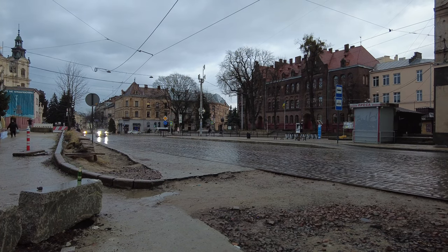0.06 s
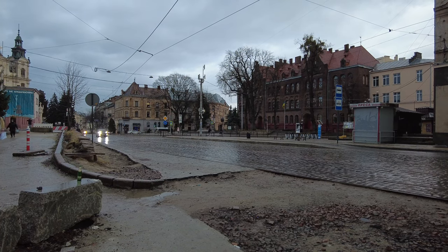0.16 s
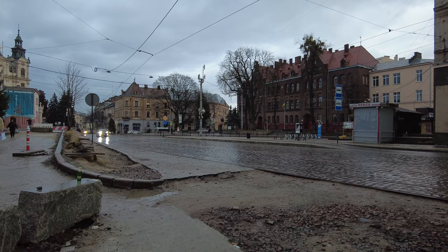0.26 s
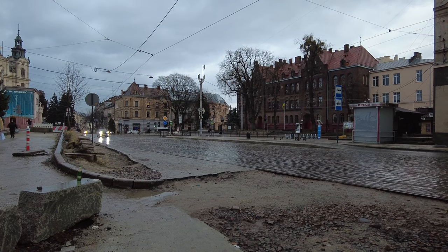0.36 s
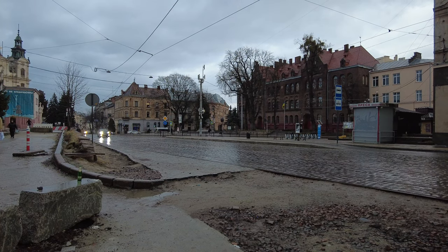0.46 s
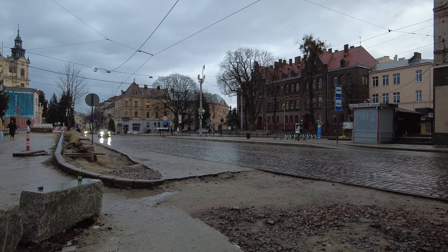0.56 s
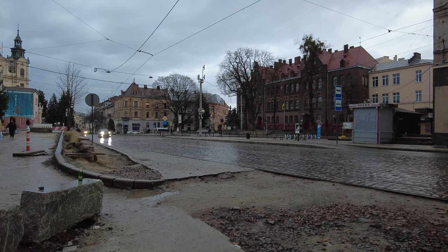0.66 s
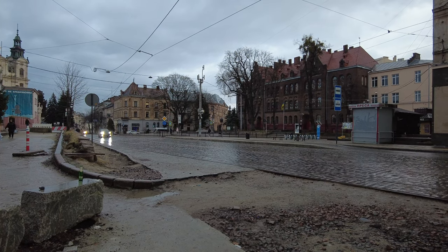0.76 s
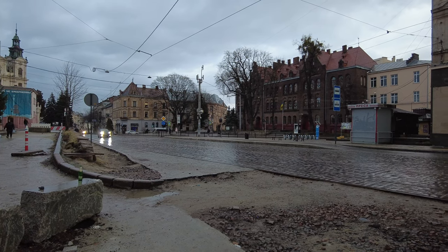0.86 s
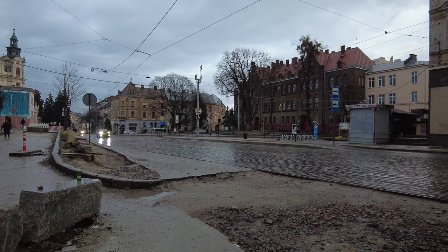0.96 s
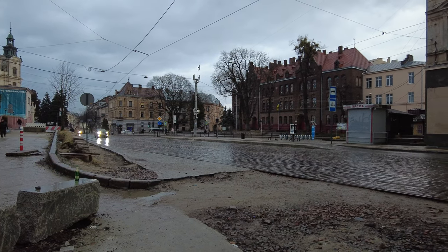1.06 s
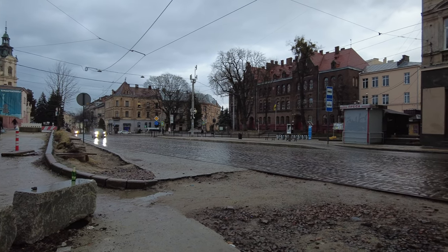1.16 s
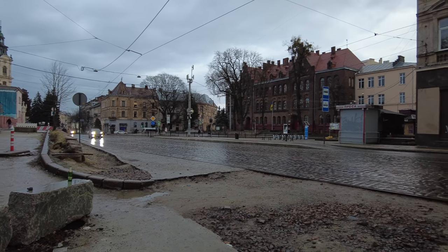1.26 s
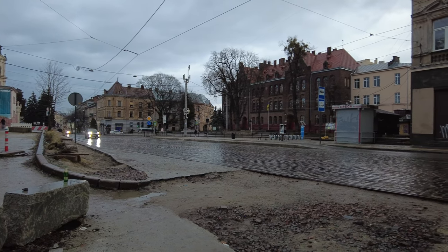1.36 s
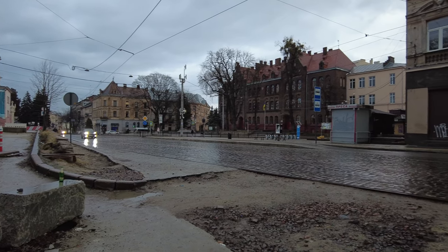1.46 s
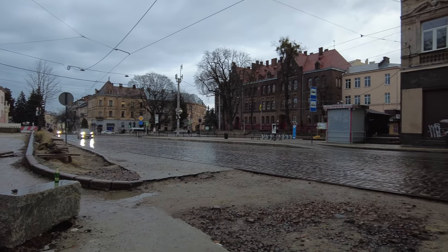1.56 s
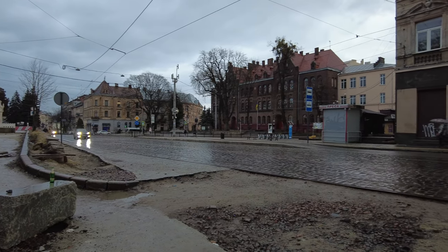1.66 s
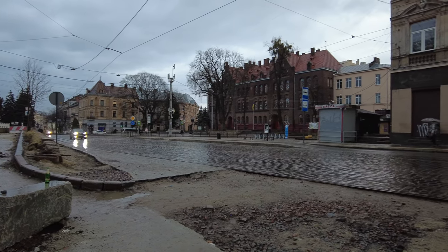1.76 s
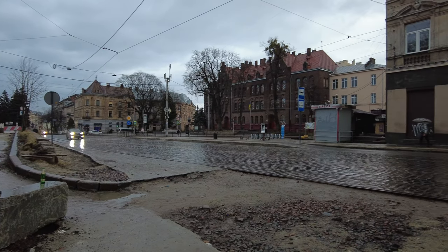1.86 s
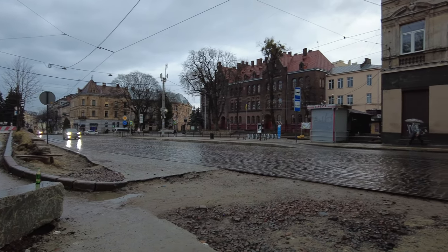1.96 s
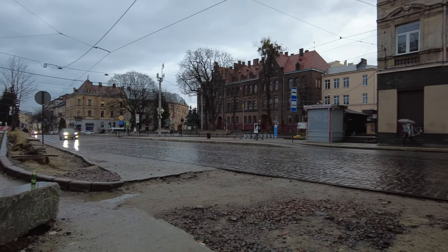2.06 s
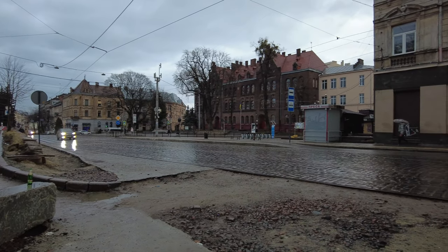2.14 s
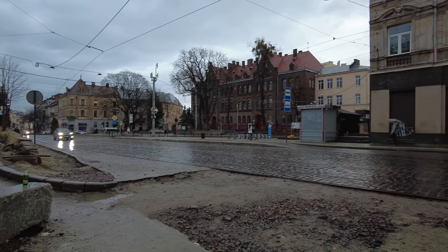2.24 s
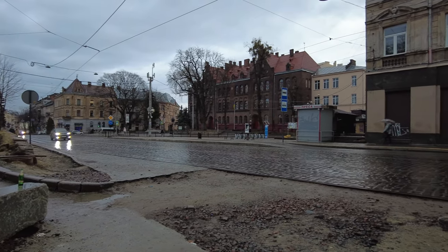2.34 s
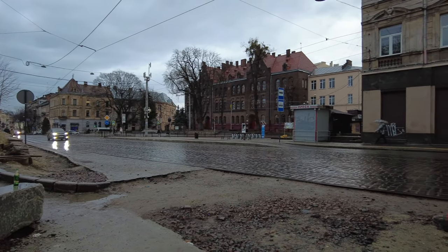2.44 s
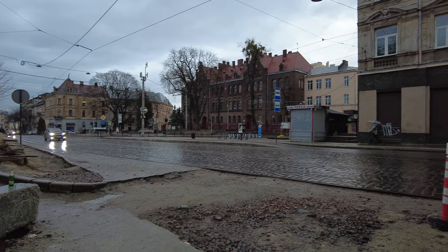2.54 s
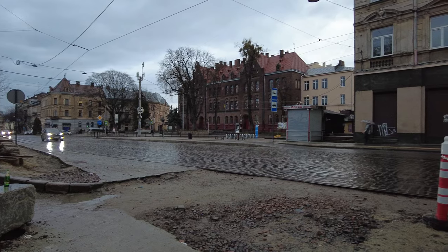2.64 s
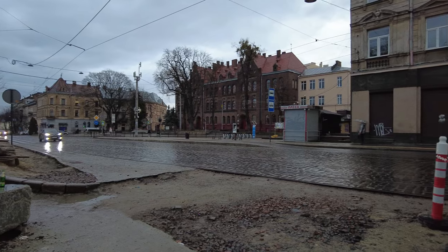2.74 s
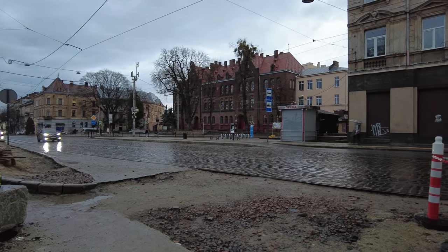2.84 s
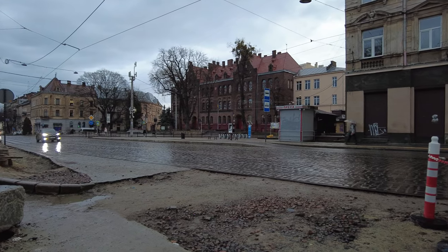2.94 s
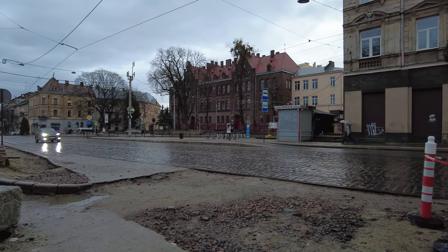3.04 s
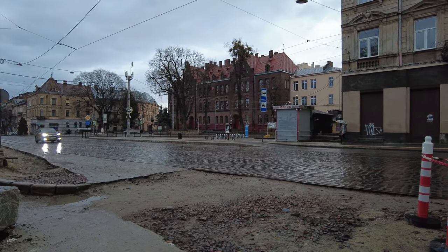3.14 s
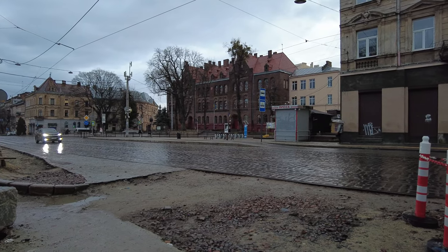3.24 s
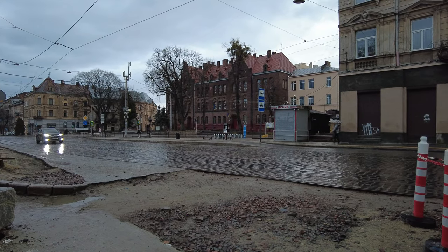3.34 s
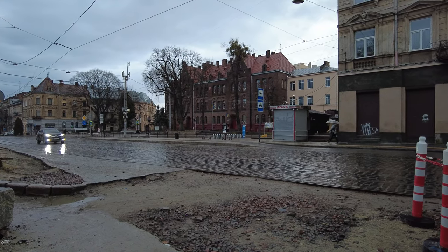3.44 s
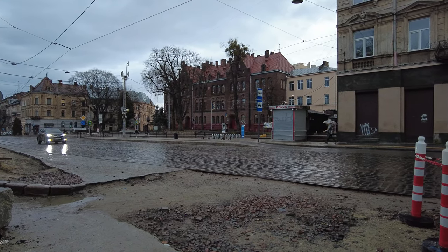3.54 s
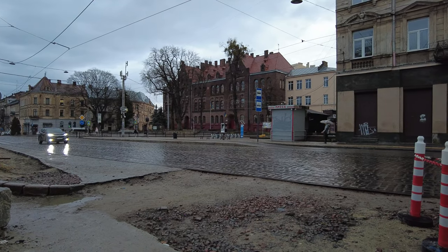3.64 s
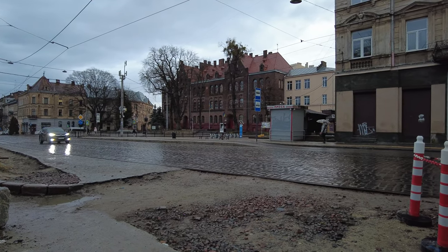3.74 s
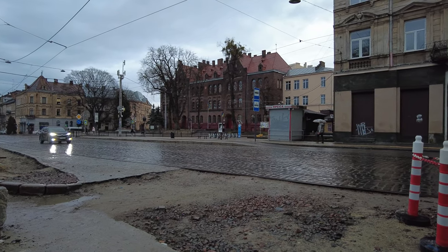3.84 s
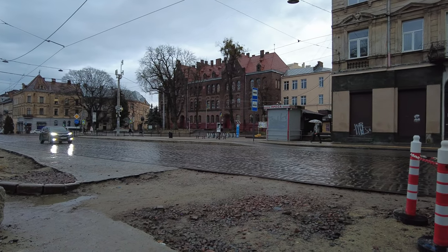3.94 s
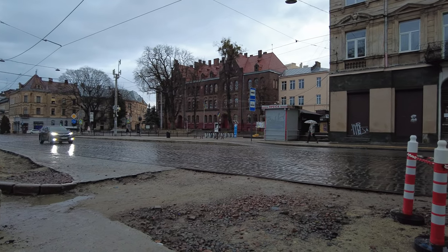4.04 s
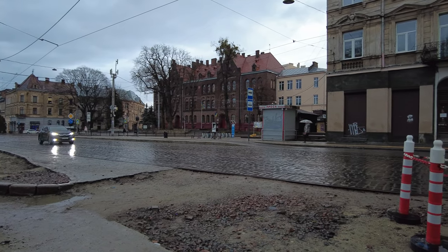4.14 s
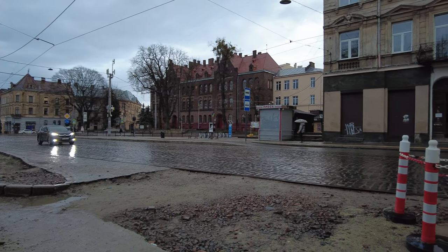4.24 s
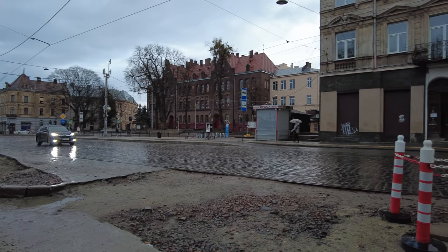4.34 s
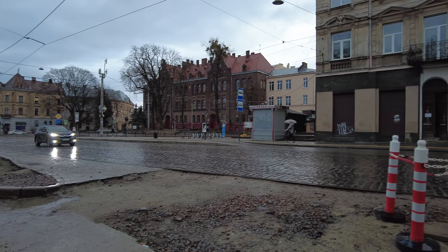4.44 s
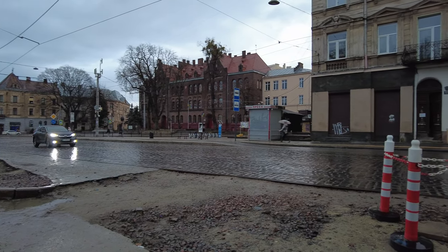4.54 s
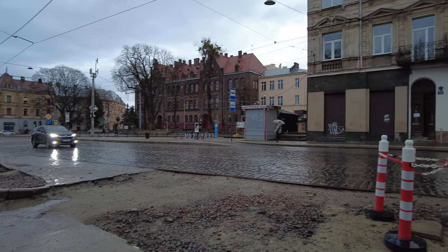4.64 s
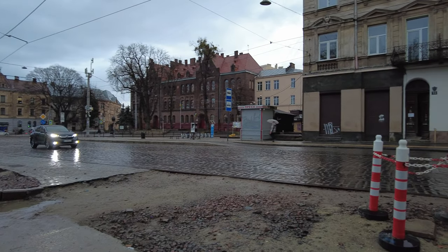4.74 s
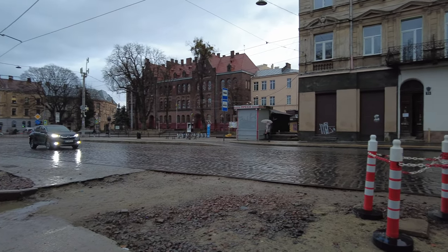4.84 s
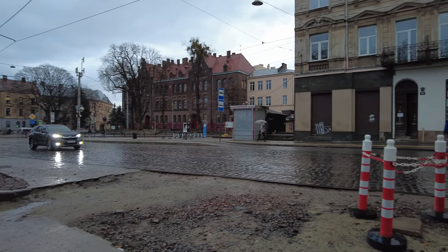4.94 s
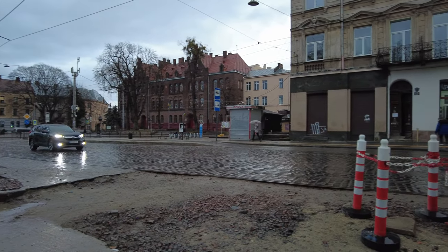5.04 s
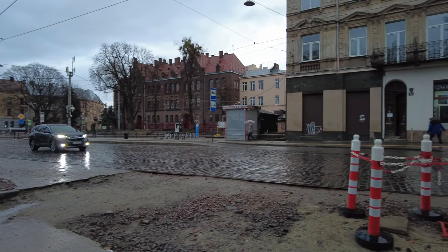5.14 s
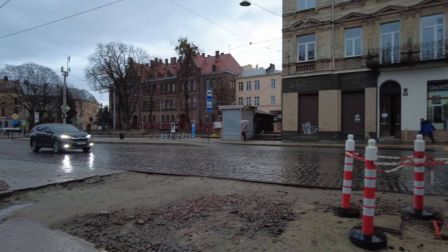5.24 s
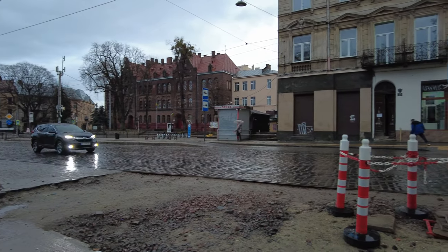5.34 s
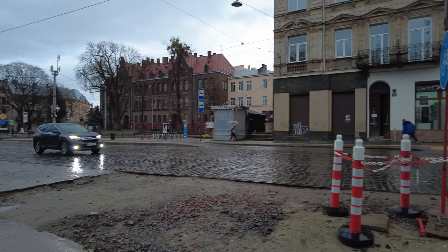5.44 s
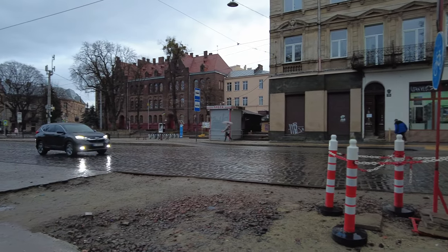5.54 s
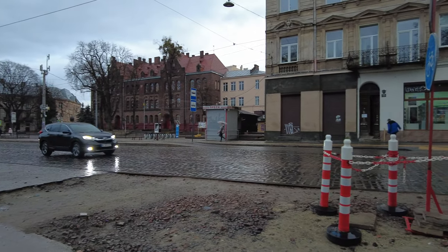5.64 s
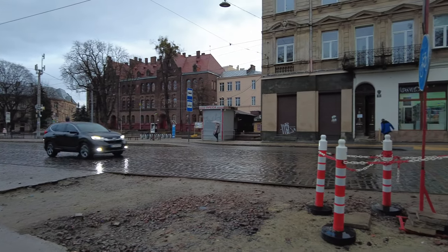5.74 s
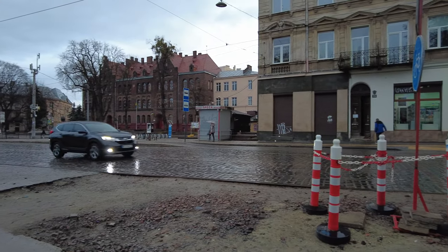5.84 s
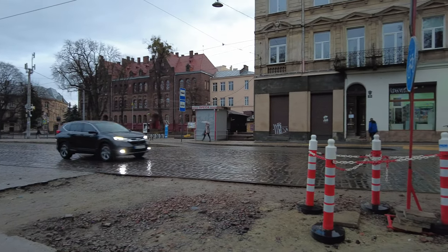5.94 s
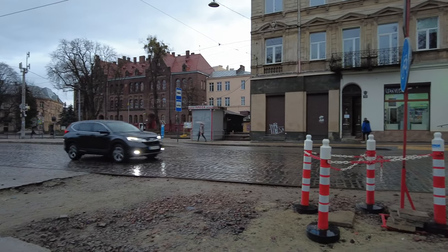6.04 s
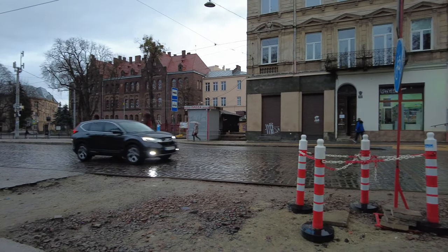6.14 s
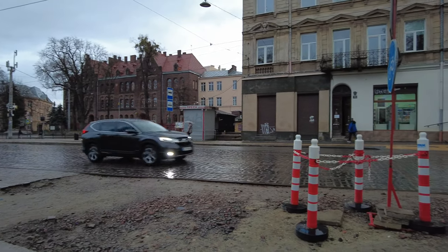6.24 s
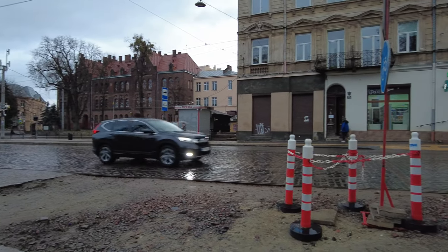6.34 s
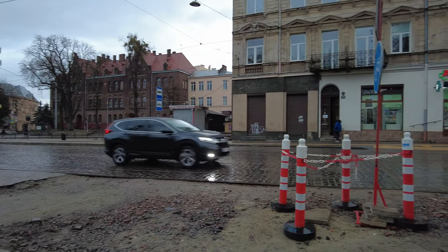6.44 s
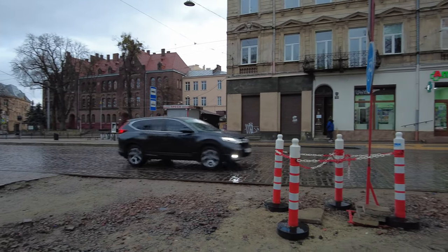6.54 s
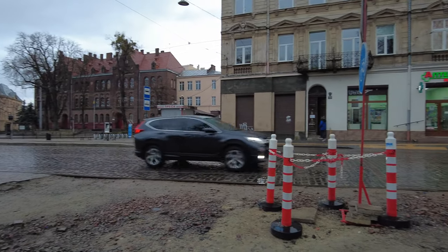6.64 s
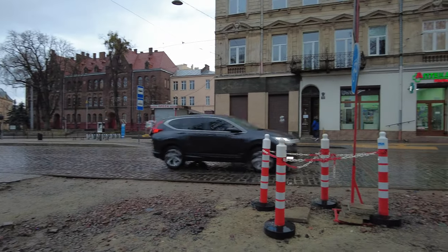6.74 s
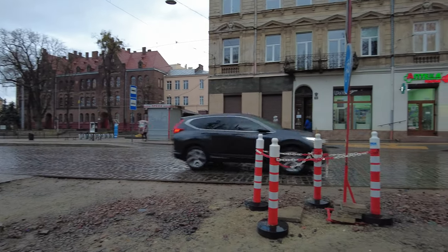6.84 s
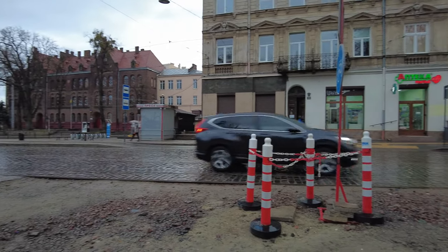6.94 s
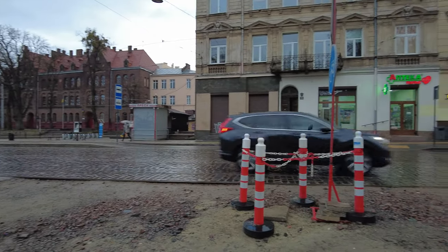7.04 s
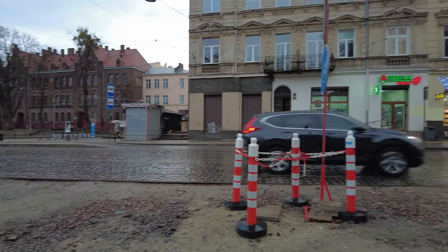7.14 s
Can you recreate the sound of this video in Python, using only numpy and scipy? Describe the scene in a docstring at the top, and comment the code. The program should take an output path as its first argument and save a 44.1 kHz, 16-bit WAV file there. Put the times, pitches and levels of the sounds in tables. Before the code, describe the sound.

On a wet cobbled square, low rumbling traffic swells and eases before a car rolls up close, its wet tyres growing louder and brighter.

```python
"""A city square with wet cobbles. From the start: deep traffic rumble with an engine hum, an unseen
vehicle and the tyres of a car rolling closer; coloured noise and slaps ringing in resonances make them.
Soon drops tick nearby (noise bursts), a brake squeals far off (a near sine) and short hisses swell.
Two microphone ports, folded to the middle, open to stereo past halfway. The car draws nearly abreast
at the end, its water hissing louder, and a wheel thuds off stones (blows ringing at two pitches)."""
import sys
import numpy as np
from scipy import signal
from scipy.fft import rfft, irfft, next_fast_len
from scipy.io import wavfile
from scipy.ndimage import map_coordinates

SR = 44100
rng = np.random.default_rng(int(sys.argv[2]) if len(sys.argv) > 2 else 0)


def pcm_store(signal):
    """Save signal as 16-bit PCM."""
    levels = np.round(np.clip(np.atleast_2d(signal), -1, 1) * 32767)
    wavfile.write(sys.argv[1], SR, levels.astype(np.int16).T)


N = 317211

# Spectra of the deep rumble, the broad drone and the rolling roar: (frequency [Hz], density [dB per Hz])
RUMBLE_SPECTRUM = [(8.8, -44), (15, 2.5), (43, -1), (90, -3), (120, -34.5)]
DRONE_SPECTRUM = [(35, -38.5), (60, -6), (70, -6), (103, -4.5), (150, -10), (204, -12.5), (262, -16.5),
                  (450, -23), (650, -34), (840, -64)]
ROAR_SPECTRUM = [(450, -9), (700, -1.5), (1080, 4), (1250, 5), (1500, 0), (2400, -5.5), (3600, -17.5),
                 (5500, -33)]
# Spectra of water squeezed from the tread and of spray: (frequency [Hz], density [dB per Hz])
SIZZLE_SPECTRUM = [(4300, -32), (4900, -1), (5400, 2.5), (5900, -2.5), (6400, -2), (7100, -9.5), (7700, -2),
                   (8800, -15.5)]
SPRAY_SPECTRUM = [(4880, -37), (8300, -8), (10600, 0), (11400, -5), (13200, -3.5), (15500, -4)]
# A duller noise band, humps near 9.4 and 12.3 kHz: (frequency [Hz], density [dB per Hz])
DULL_HISS_SPECTRUM = [(7000, -30), (8600, -3.5), (9400, 2), (10300, -6), (12300, 0.5), (12800, -3),
                      (13100, -24), (15500, -26)]

# Tyre resonances, CAVITY being the air inside: (frequency [Hz], width [Hz], gain [dB])
SIDEWALL_MODES = [(600, 340, 0)]
FLANK_MODES = [(920, 285, 0)]
CAVITY_MODES = [(200, 53, 0)]
CARCASS_MODES = [(884, 182, -5.5)]   # before the pitch ratio below
TREAD_MODES = [(1848, 450, 8.9), (2190, 750, 1.2)]
SHOULDER_MODES = [(2760, 1960, 0)]
GROOVE_MODES = [(4080, 560, 6.4), (4437, 530, 4.6)]
GROOVE_EDGE_MODES = [(4880, 360, 0)]
GUTTER_MODES = [(6340, 620, 0)]
# The carcass ring sinks as the car comes abreast: (time [s], pitch ratio [1])
CARCASS_PITCH = [(6.72, 0.96), (7.15, 0.92)]

# Level of the deep rumble, before its surges: (time [s], level [dB])
RUMBLE_LEVEL = [(0.0, -54), (0.25, -54), (0.75, -44), (1.5, -44.5), (2.3, -41), (2.72, -36.5), (2.95, -44),
                (3.8, -40.5), (4.4, -45), (5.3, -43.5), (5.9, -43), (7.19, -37)]
SURGE_DB, SURGE_RATE_HZ = 0.56, 11
# An unseen vehicle swells, dips at about 4.6 s, then slowly gains a little: (time [s], relative level [dB])
UNSEEN_LEVEL = [(0.0, -13.5), (0.4, -11.5), (0.9, -9), (1.6, -7), (2.4, -2.5), (3.5, -1), (4.15, 0.5),
                (4.4, -2.5), (4.65, -5.5), (7.19, -3)]
# An idling engine's lowest order, and its share of the unseen vehicle's level changes
HUM_MEAN_HZ, HUM_DB, HUM_SHARE = 42.74, -43, 0.62
# The car in view: moment abreast, speed, and distance from the microphone when abreast
PASS_S, SPEED_M_S, KERB_M = 7.337, 8.52, 5.78
# Layer name: (unseen vehicle [dB], steepness of its level changes [1], car at its loudest [dB],
# steepness of its approach [1], loudest before abreast [s], lull [dB])
LAYER_SETTINGS = {"drone": (-45.5, 1.05, -39, 0.51, 0.1, -1.15), "roar": (-60.5, 0.93, -63, 1, 2, -1),
                  "sidewall": (-66, 0.5, -52, 1.7, 0.59, -11.5), "carcass": (-62, 1.54, -53, 6, 0.15, -13),
                  "tread": (-67, 1.2, -51, 1.5, -0.15, -3),
                  "shoulder": (-71.5, 1.1, -63.5, 1.5, 1.16, -0.5),
                  "groove": (-68.5, 1.38, -53.5, 3, 0.45, 0.5), "sizzle": (-80.5, 2, -67, 1.24, 0.32, 2),
                  "groove edge": (-82, 2.5, -62.5, 9.5, 0.38, -5), "mist": (-99, 2, -88, 0.65, 1, 3),
                  "spray": (-112, 3, -76.5, 1.5, 0.57, -5), "flank": (-73.5, 0.5, -60, 2.2, 1.0, -4.5),
                  "cavity": (-65.5, 0.5, -50, 1.1, 0.26, 2), "gutter": (-83.5, 2.5, -86, 1, 1, -7)}
# The lull sets in, is full, starts to lift and is over: (time [s])
LULL_TIMES = [4.55, 4.95, 5.64, 5.74]

# Drops ticking close by: (time [s], snap peak [dB], snap pitch [Hz], body over snap [dB], decay time [ms])
DROPS = [(0.163, -70, 9000, 9, 3.8), (0.7447, -73, 9500, -6, 1.5), (0.838, -69, 8500, 6, 6),
         (0.977, -75, 10000, -6, 2), (0.9864, -62, 11000, -13, 4.6), (1.1233, -71, 10500, -3.5, 3),
         (1.2431, -68, 8500, -3, 2), (1.328, -70, 9000, 10, .6), (1.35, -75.5, 8500, 23.5, 5.7),
         (1.936, -73, 7700, -3, 3), (2.0752, -72, 8700, -3, 3.4), (2.7472, -68.5, 9000, -1, 3),
         (2.8815, -63, 9500, -11, 5.1), (3.1058, -65.5, 7700, 7, 3), (3.2625, -68, 7000, 0, 2),
         (3.9464, -69, 9000, 6, 6), (6.2162, -51, 6900, -6, 5)]
# The distant brake squeal: (time [s], level [dB])
SQUEAL_LEVELS = [(0.51, -96), (0.54, -80.5), (0.745, -81), (0.78, -70), (0.82, -77), (0.87, -79),
                 (1.04, -78), (1.13, -84), (1.23, -98)]
# Its overtone, under the tone: (time [s], level [dB])
OVERTONE_LEVELS = [(0.55, -21), (0.63, -10), (0.72, -31), (0.85, -10.5), (0.98, -16), (1.08, -32)]
# Squeal pitch, before its wobble: steady, then climbing to a top
SQUEAL_HZ, CLIMB_FROM_S, CLIMB_HZ_PER_S, SQUEAL_TOP_HZ = 6020, 0.81, 1200, 6300
# Short hisses, faint at first and stronger at the end, level before the swell:
# (start [s], end [s], low edge [Hz], high edge [Hz], level [dB])
SHORT_HISSES = [(0.858, 1.05, 7340, 8700, -82), (1.22, 1.318, 7290, 8300, -81),
                (2.293, 2.592, 10800, 12700, -85), (2.452, 2.56, 10500, 15500, -83),
                (5.63, 5.655, 11500, 12100, -73), (6.92, 6.99, 6500, 11000, -66),
                (6.897, 7.45, 6000, 15500, -59)]
# A wheel drops off a stone: (time [s], carcass force [dB], tread force [dB])
WHEEL_DROPS = [(6.853, -40.5, -58), (6.88, -36, -44.5), (6.893, -29, -42), (7.048, -41.5, -40.5),
               (7.176, -30, -50)]
# Ringing pitches of carcass and tread: (frequency [Hz])
THUD_PITCHES = [815, 1836]
THUD_T60_S = 0.043

# Delay of the right port behind the left: (time [s], lag [ms])
PORT_LAG = [(4.3, 0.055), (6.2, 0.092), (7.19, 0.024)]
# Scattered sound, unlike at the two ports, over the direct sound: (frequency [Hz], level [dB])
SCATTER_SPECTRUM = [(100, -59), (500, -21), (800, -3.5), (1050, -2), (1350, -5.5), (2600, -1.5), (3400, -2),
                    (4300, -5), (5700, -2), (7000, 4.5), (15000, 11)]
# Level of the left port over the right, by frequency: (frequency [Hz], level [dB])
LEFT_OVER_RIGHT = [(400, 0), (800, 1.5), (1300, 0), (3000, 2), (4300, -1), (5600, 2), (6500, -1), (8000, 3),
                   (15000, 2.5)]
# The stereo starts to open and is fully open: (time [s])
OPENING_TIMES = [4.32, 4.82]
# The right port hears this band upside down: (edge frequency [Hz])
FLIP_BAND = [805, 1183]
FLIP_EDGE_HZ, BASS_LAG_MS = 50, 0.069
FOLD_HZ, FOLD_DB = 2580, -9.5   # while folded, only the treble keeps some scatter
FLOOR_DB, CUTOFF_HZ = -110, 15700   # self-noise before the top cut, and that cut


def amp(db):
    """Amplitude factor for a level in dB."""
    return 10 ** (np.asarray(db) / 20)


def rms_one(x):
    """Scale to an RMS of 1 over all channels together."""
    return x / np.sqrt(np.mean(x ** 2) + 1e-20)


def in_time(rows):
    """Draw each column of a time table as a curve, one value per sample."""
    s, *columns = np.transpose(rows)
    return [np.interp(np.arange(N) / SR, s, column) for column in columns]


def colour(x, points, beyond_db=None):
    """Filter by a (Hz, dB) table, straight lines over log frequency, without phase shift."""
    size = next_fast_len(N)
    hz, level_db = np.transpose(points)
    bins_hz = np.arange(size // 2 + 1) * SR / size
    gain_db = np.interp(np.log(bins_hz + 1), np.log(hz), level_db, beyond_db, beyond_db)
    return irfft(rfft(x, size) * amp(gain_db), size)[..., :N]


def drift(rate_hz):
    """Slow chance of spread 1: noise smoothed by a double pole, made at every 40th sample."""
    r = np.exp(-80 * np.pi * rate_hz / SR)
    noise = rng.standard_normal(N // 40 + 2002)
    slow = signal.lfilter([1], [1, -2 * r, r * r], noise)[2000:]   # settled part only
    return np.interp(np.arange(N) / 40, np.arange(len(slow)), rms_one(slow))


def resonate(x, hz, width_hz):
    """Two-pole resonance, gain about 1 on top."""
    r = np.exp(-np.pi * width_hz / SR)
    zeros = np.array([1, 0, -1]) * (1 - r * r) / 2
    return signal.lfilter(zeros, [1, -2 * r * np.cos(2 * np.pi * hz / SR), r * r], x)


def coloured_noise(spectrum):
    """Noise of one colour, three times: direct, and scattered at each port."""
    return rms_one(colour(rng.standard_normal((3, N)), spectrum, -95.0))


def layer_gain(layer):
    """Unseen vehicle and approaching car add in power; the car's level follows its distance; then the lull."""
    far_db, steepness, near_db, approach, lead_s, lull_db = LAYER_SETTINGS[layer]
    t = np.arange(N) / SR
    along_m = SPEED_M_S * (PASS_S - lead_s - t)
    nearness_db = -10 * np.log10(1 + (along_m / KERB_M) ** 2)
    unseen = amp(far_db + steepness * in_time(UNSEEN_LEVEL)[0])
    car = amp(near_db + approach * nearness_db)
    return np.hypot(unseen, car) * amp(lull_db * np.interp(t, LULL_TIMES, [0, 1, 1, 0]))


def traffic():
    """Deep rumble of coloured noise in surges, with a sine engine hum wavering in pitch and level."""
    hum_db = HUM_DB + HUM_SHARE * in_time(UNSEEN_LEVEL)[0] + 4.25 * drift(4.3)
    hum_hz = HUM_MEAN_HZ * (1 + 0.089 * drift(2.51))
    hum = np.sqrt(2) * amp(hum_db) * np.sin(2 * np.pi * np.cumsum(hum_hz) / SR)
    rumble_db = in_time(RUMBLE_LEVEL)[0] + SURGE_DB * drift(SURGE_RATE_HZ)
    return amp(rumble_db) * coloured_noise(RUMBLE_SPECTRUM) + hum * [[1], [0], [0]]   # hum is direct only


def slaps(per_s, spread_db):
    """Tread blocks meet the stones at random, with uneven force of either sign."""
    force_db = spread_db * np.minimum(rng.exponential(1, (3, N)), 4)
    force = amp(force_db) * rng.choice([-1, 1], (3, N))
    return force * (rng.random((3, N)) < per_s / SR)


def tyre_ring(modes, per_s):
    """Slaps ring through resonances, each passed twice for steep sides, in alternating sign."""
    blows = slaps(per_s, spread_db=4.0)
    ring = 0
    for k, (hz, width_hz, db) in enumerate(modes):
        ring = ring + amp(db) * (-1) ** k * resonate(resonate(blows, hz, width_hz), hz, width_hz)
    return rms_one(ring)


def carcass_ring():
    """Carcass resonance, read ever more slowly near the end so that its pitch sinks."""
    ring = tyre_ring(CARCASS_MODES, 3000.)
    position = np.cumsum(in_time(CARCASS_PITCH)[0].clip(0, 1))
    return np.array([np.interp(position, np.arange(N), row) for row in ring])


def broad_roll(jolt):
    """Broad, low tyre sound: drone and roar of noise, and slaps ringing in sidewall, flank and cavity."""
    roll = layer_gain("drone") * coloured_noise(DRONE_SPECTRUM)
    roll = roll + layer_gain("roar") * amp(0.36 * jolt) * coloured_noise(ROAR_SPECTRUM)
    roll = roll + layer_gain("sidewall") * amp(0.29 * jolt) * tyre_ring(SIDEWALL_MODES, 2500.)
    roll = roll + layer_gain("flank") * tyre_ring(FLANK_MODES, 4000.)
    return roll + layer_gain("cavity") * tyre_ring(CAVITY_MODES, 1000.)


def tread_rings(jolt):
    """Higher tyre resonances struck by the slaps, each flickering in level by itself."""
    rings = layer_gain("carcass") * amp(0.5 * jolt + 2.0 * drift(22)) * carcass_ring()
    rings = rings + layer_gain("tread") * amp(0.2 * jolt + 1.2 * drift(20)) * tyre_ring(TREAD_MODES, 5000.)
    rings = rings + layer_gain("shoulder") * amp(1.54 * drift(17)) * tyre_ring(SHOULDER_MODES, 9000.)
    rings = rings + layer_gain("groove") * amp(0.95 * jolt + 1.3 * drift(7.1)) * tyre_ring(GROOVE_MODES, 12000.)
    return rings + layer_gain("groove edge") * amp(1.0 * drift(14)) * tyre_ring(GROOVE_EDGE_MODES, 9000.)


def tyre_water():
    """Water hissing out from under the tyres: flickering noise bands and one dense ring of slaps."""
    water = layer_gain("sizzle") * amp(1.74 * drift(28)) * coloured_noise(SIZZLE_SPECTRUM)
    water = water + layer_gain("spray") * amp(1.0 * drift(25)) * coloured_noise(SPRAY_SPECTRUM)
    water = water + layer_gain("gutter") * amp(1.9 * drift(12)) * tyre_ring(GUTTER_MODES, 12000.)
    dull_hiss_gain = layer_gain("mist")   # only a table key: the duller noise band
    return water + dull_hiss_gain * amp(1.6 * drift(16)) * coloured_noise(DULL_HISS_SPECTRUM)


def tyres():
    """Broad roll, and higher rings with water; the uneven stones jolt several layers together."""
    jolt = drift(21)
    return broad_roll(jolt), tread_rings(jolt) + tyre_water()


def ticks():
    """Each drop is a short bright burst of noise, the snap, over a duller body."""
    out, t = np.zeros(N), np.arange(900) / SR
    noises = rng.standard_normal((len(DROPS), 2, len(t)))
    for (s, db, hz, body_db, decay_ms), noise in zip(DROPS, noises):
        shape = np.minimum(t / 0.00045, 1) * np.exp(-1000 * t / max(decay_ms, 0.2))
        snap = resonate(resonate(noise[0] * shape, hz, 5000.), hz, 5000.)
        body = resonate(resonate(noise[1] * shape, 2300., 3000.), 2300., 3000.)
        drop = snap / np.abs(snap).max() + amp(body_db) * body / np.abs(body).max()
        out[round(s * SR):][:len(t)] += amp(db) * drop
    return signal.sosfilt(signal.butter(6, 12800, fs=SR, output="sos"), out)


def squeal():
    """A far brake: a near sine with one overtone, wobbling in pitch, fluttering and breaking up."""
    t = np.arange(N) / SR
    climb_hz = SQUEAL_HZ + CLIMB_HZ_PER_S * (t - CLIMB_FROM_S)
    hz = np.clip(climb_hz, SQUEAL_HZ, SQUEAL_TOP_HZ) + 15.0 * drift(60)
    phase = 2 * np.pi * np.cumsum(hz) / SR
    flutter = np.abs(1 + 0.47 * drift(60))
    overtone = amp(in_time(OVERTONE_LEVELS)[0] + 3.0 * drift(40)) * np.sin(2 * phase)
    sounding = (t > SQUEAL_LEVELS[0][0]) & (t < SQUEAL_LEVELS[-1][0])
    level = sounding * np.sqrt(2) * amp(in_time(SQUEAL_LEVELS)[0])
    return level * (flutter * np.sin(phase) + overtone)


def hisses():
    """Short swells of band noise; each quarter of the band flickers by itself."""
    out, noise = np.zeros(N), rng.standard_normal((4, N))
    flicker = [drift(25) for _ in noise]
    for start_s, end_s, low_hz, high_hz, db in SHORT_HISSES:
        a, full_end = round(start_s * SR), round(end_s * SR)
        b = min(full_end, N)
        edges = np.linspace(low_hz, high_hz, len(noise) + 1)
        band = 0
        for k, f in enumerate(flicker):
            bandpass = signal.butter(1, edges[k:k + 2], "band", fs=SR, output="sos")
            band = band + amp(4.1 * f[a:b]) * signal.sosfilt(bandpass, noise[k, a:b])
        swell = np.hanning(full_end - a)[:b - a] ** 0.27   # the last one is cut off by the end
        out[a:b] += amp(db) * rms_one(band) * swell
    return out


def thuds():
    """Soft blows ringing briefly in carcass and tread, as decaying sines."""
    out, r = np.zeros(N), amp(-60 / (THUD_T60_S * SR))
    at = [round(row[0] * SR) for row in WHEEL_DROPS]
    for column, hz in enumerate(THUD_PITCHES, 1):
        blows, w = np.full(N, 1e-18), 2 * np.pi * hz / SR   # tiny offset keeps the filters from denormals
        blows[at] = amp([row[column] for row in WHEEL_DROPS])
        softened = resonate(blows, hz, 1000.0)
        out += signal.lfilter([0, np.sin(w)], [1, -2 * r * np.cos(w), r * r], softened)
    return out


def twist(x):
    """Turn one band upside down by phase, with soft edges; what lies below it comes a little later."""
    size = next_fast_len(N)
    hz = np.arange(size // 2 + 1) * SR / size
    low_edge = np.tanh((hz - FLIP_BAND[0]) / FLIP_EDGE_HZ)
    inside = low_edge - np.tanh((hz - FLIP_BAND[1]) / FLIP_EDGE_HZ)   # 2 within the band
    lag_s = BASS_LAG_MS / 1000 * (1 - low_edge) / 2
    turned = rfft(x, size) * np.exp(-.5j * np.pi * inside - 2j * np.pi * hz * lag_s)
    return irfft(turned, size)[:N]


def ports(broad, direct, scattered):
    """Fade from the folded middle to two ports: the right lags and twists the broad sound, each scatters."""
    arrival = np.arange(N) - in_time(PORT_LAG)[0] * SR / 1000
    far = map_coordinates(direct + twist(broad), [arrival], order=3, mode="nearest")
    own = colour(scattered, SCATTER_SPECTRUM)
    # direct and scatter share the power
    evened = [(hz, -10 * np.log10(1 + amp(db) ** 2)) for hz, db in SCATTER_SPECTRUM]
    left, right = colour(np.array([broad + direct, far]) + own, evened)
    opened = np.array([left, colour(right, [(hz, -db) for hz, db in LEFT_OVER_RIGHT])])
    highpass = signal.cheby2(10, 50, FOLD_HZ, "high", fs=SR, output="sos")
    treble = signal.sosfilt(highpass, scattered[0])
    folded = broad + direct + amp(FOLD_DB) * treble * [[1], [-1]]   # opposite signs left and right
    opening = np.interp(np.arange(N) / SR, OPENING_TIMES, [0, 1])
    return (1 - opening) * folded + opening * opened


def scene():
    """All sources at the two ports; row 0 is direct sound, rows 1 and 2 are scattered."""
    rumble = traffic()
    roll, rings = tyres()
    details = ticks() + squeal() + hisses() + thuds()
    return ports(rumble[0] + roll[0], rings[0] + details, rumble[1:] + roll[1:] + rings[1:])


def record(dry):
    """A faint white self-noise is added, then a steep low-pass cuts the top."""
    wet = dry + amp(FLOOR_DB) * rng.standard_normal(dry.shape)
    return signal.sosfilt(signal.ellip(12, .3, 60, CUTOFF_HZ, fs=SR, output="sos"), wet)


dry = scene()
out = record(dry)
pcm_store(out)
```